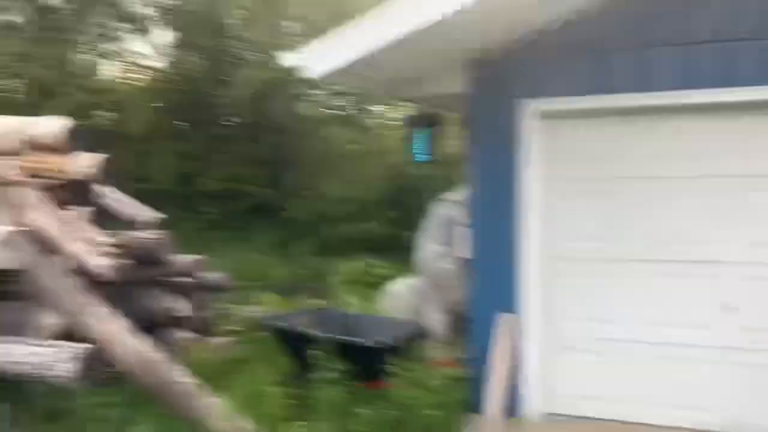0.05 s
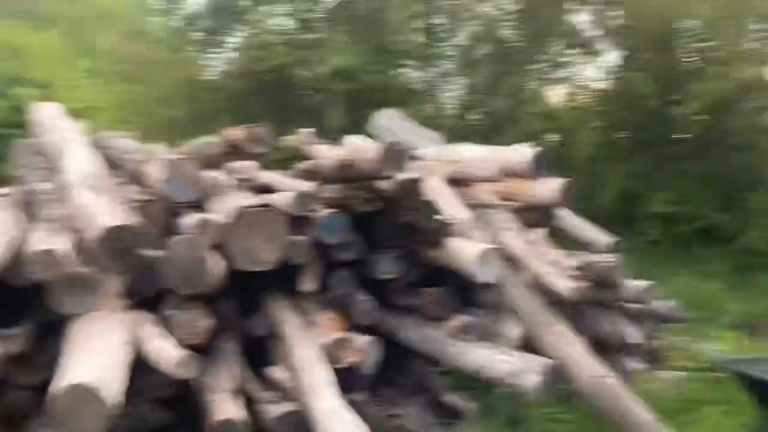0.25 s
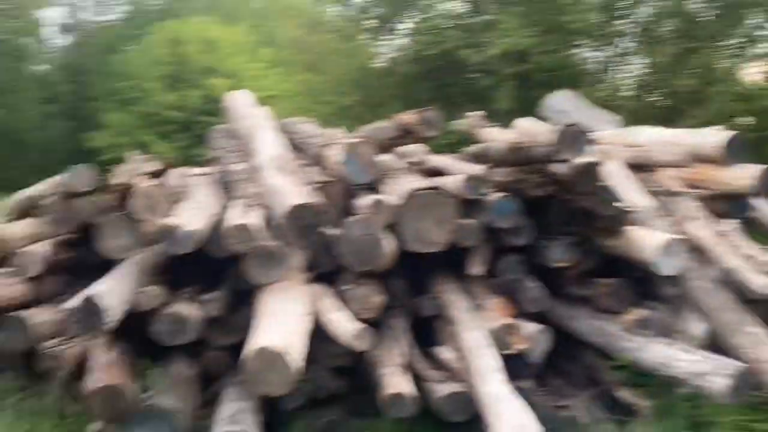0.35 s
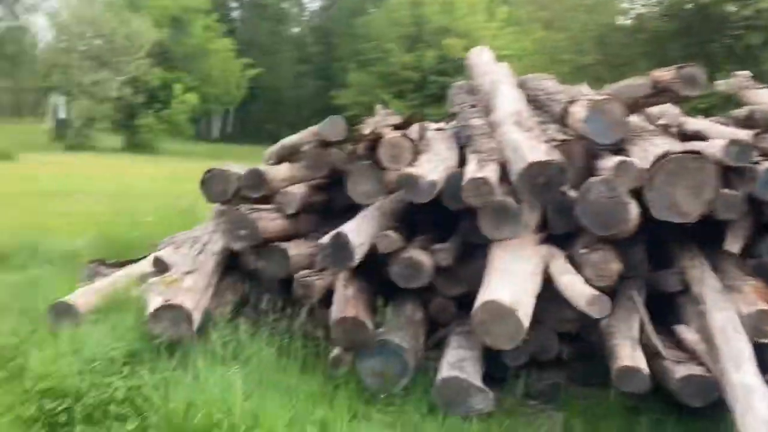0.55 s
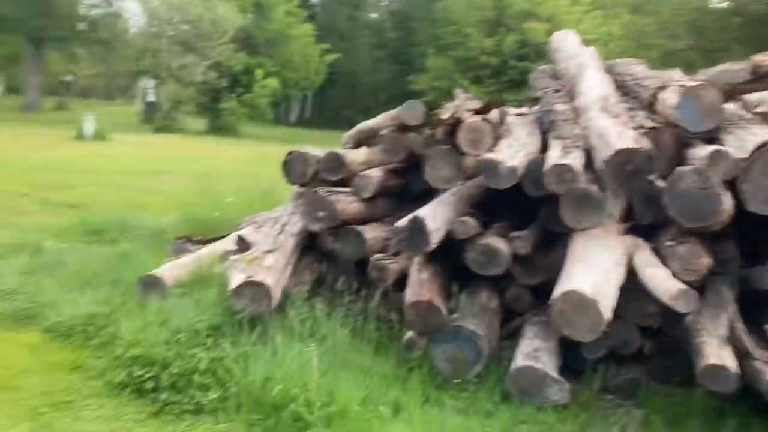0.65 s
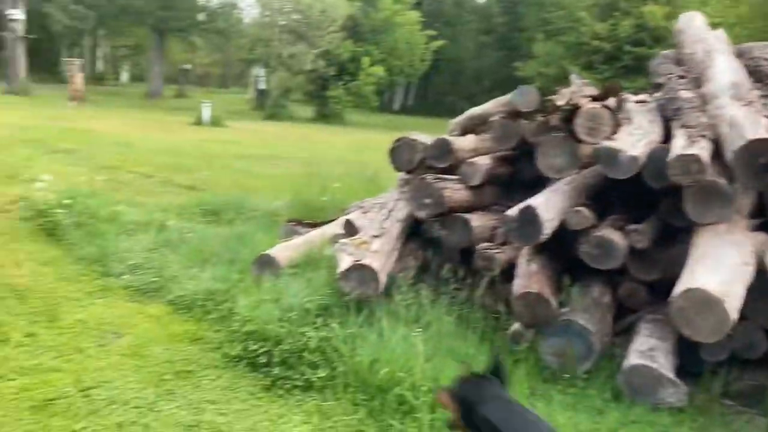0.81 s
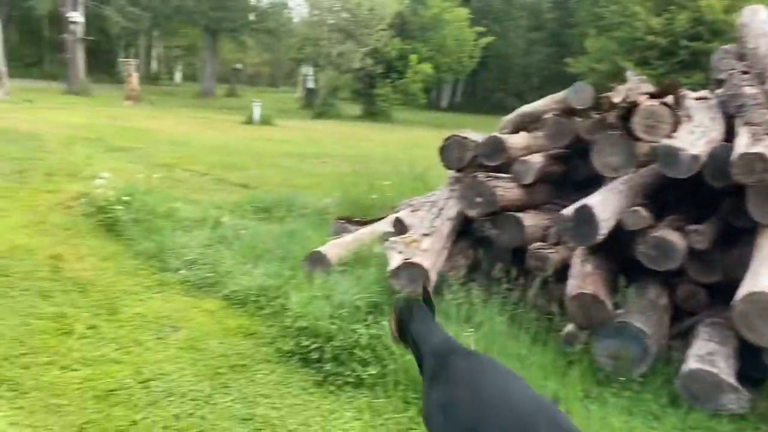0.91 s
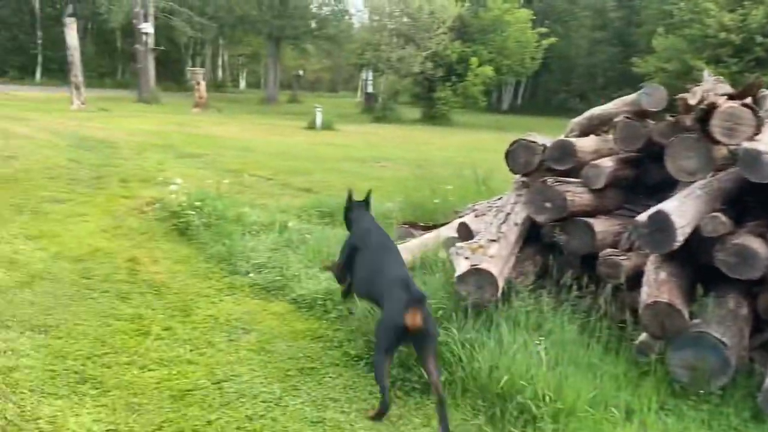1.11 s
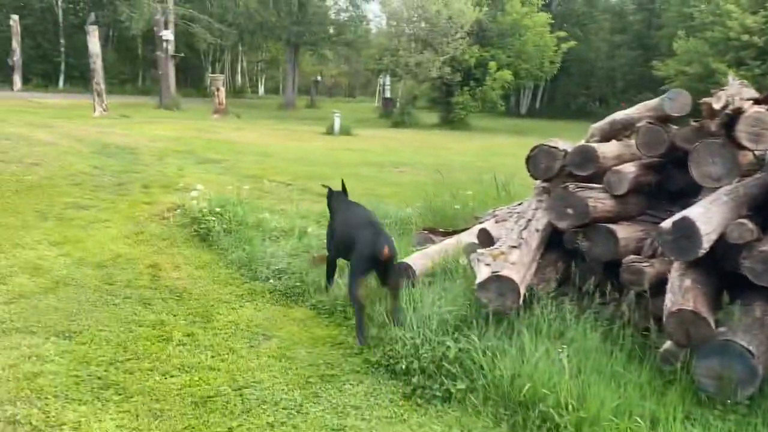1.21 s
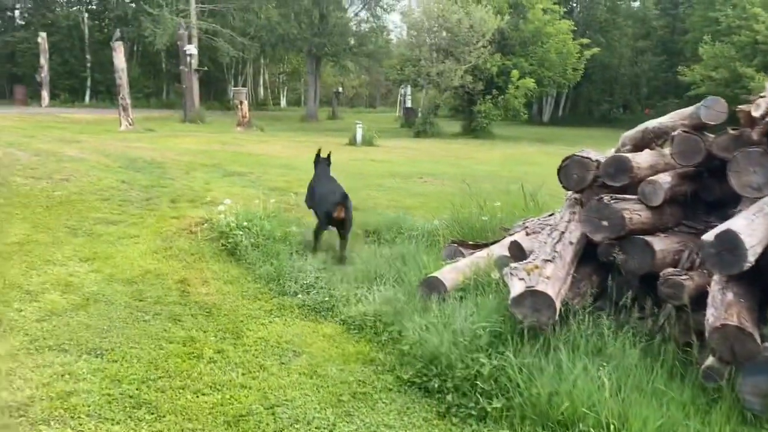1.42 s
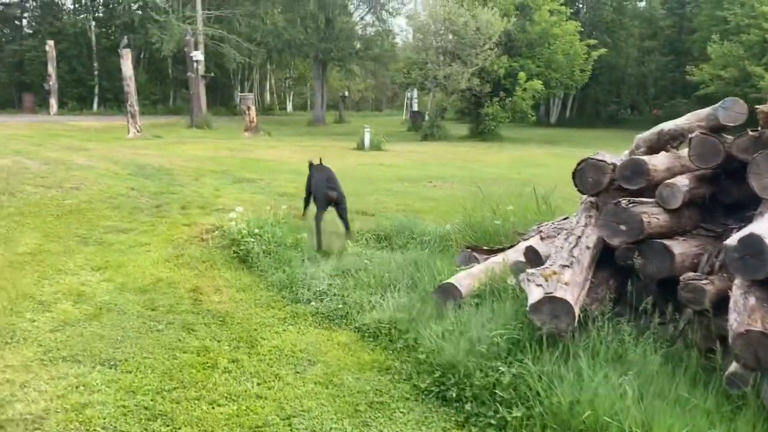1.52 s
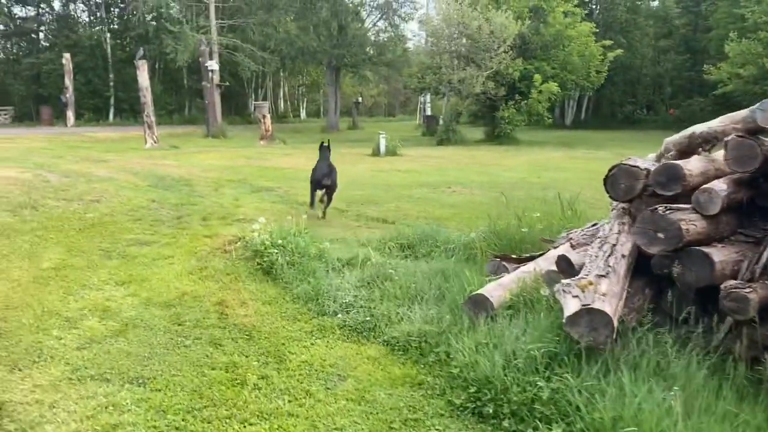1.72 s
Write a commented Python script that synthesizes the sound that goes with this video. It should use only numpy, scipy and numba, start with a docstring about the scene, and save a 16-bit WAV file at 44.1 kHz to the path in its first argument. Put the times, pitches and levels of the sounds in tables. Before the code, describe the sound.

A big dog barks close by outdoors. The faint, breathy end of an earlier call fades in the first 0.1 seconds, then one loud, rough bark sounds from 0.2 to 0.4 seconds, falling in pitch with a short echo. Soft footfalls and grass swishes follow until about 1.6 seconds, with tiny snaps and faint squeaks near 1.2 seconds. Low air rumble on the microphone runs underneath.

```python
"""A big dog's call falls away, and at once it barks again, close by on a lawn. The bark starts rough,
every second pulse weak, clears at its peak and drops in pitch: vocal-fold pulses and breath are the
source, throat and mouth the filter. Walls, logs and trees scatter it back. Then come soft footfalls
(damped impacts) and swishes of grass (friction), with tiny snaps and squeaks, over a low rumble of air
on a hand-held phone."""
import sys
import numpy as np
from scipy import signal
from scipy.fft import rfft, irfft
from scipy.io import wavfile
from scipy.ndimage import uniform_filter1d
from numba import njit

SR = 44100
rng = np.random.default_rng(int(sys.argv[2]) if len(sys.argv) > 2 else 0)


def store_wav(level_fs):
    """Save 16-bit WAV to argv[1]."""
    pcm = np.round(np.clip(np.atleast_2d(level_fs), -1, 1) * 32767)
    wavfile.write(sys.argv[1], SR, pcm.T.astype(np.int16))


N = 77175
TIME_S = np.arange(N) / SR

# vibration rate of the vocal folds: time_s, pitch_hz
BARK_PITCH = [(0.217, 335), (0.231, 350), (0.238, 378), (0.245, 404), (0.259, 421), (0.272, 419),
              (0.279, 404), (0.286, 366), (0.303, 351), (0.322, 314), (0.344, 245), (0.368, 212)]
# course of the bark; doubling (0-1) weakens every second pulse, rasp is relative to the voice:
# time_s, level_db, doubling, rasp_db, resonance_scale, opening_db
BARK_CONTOUR = [(0.219, -46, 0.4, -12, 1.2, -8.5), (0.225, -25, 0, -13.5, 1.0, -8.5),
                (0.23, -22, 0.2, -14, .99, -0.5), (0.237, -17.5, 1, -15, 0.99, 2.5),
                (0.256, -15.5, 0.74, -15.5, 1.02, 7), (0.276, -14.5, 1, -13, 1.04, 6),
                (0.285, -15, 0.25, -11, 1.01, 5.5), (0.291, -8.5, 0, -16, 0.93, 1),
                (0.303, -13.5, 0.4, -13.5, .97, 7.5), (0.311, -20, 0, -11, 0.94, 0.5),
                (0.324, -22, 0, -8.5, 0.98, -6), (0.345, -41, 0.45, 0.5, 0.98, 3),
                (0.37, -49.5, 0.3, 2.5, 0.93, 6.5)]
# fundamental radiated by chest and neck: time_s, level_db
BARK_CHEST = [(0.219, -63.5), (0.226, -34), (0.258, -33), (0.285, -41.5), (0.312, -37.5), (0.33, -43),
              (0.354, -45), (0.375, -60.5)]
# lower (throat) and upper (mouth) formants with the jaws wide: centre_hz, width_hz, gain_db
BARK_THROAT = [(627.5, 161, 13.5), (734.5, 126.6, 12.5), (1020, 170, 2.5)]
BARK_MOUTH = [(1497, 98, 5), (1657, 140, 2), (1862, 90, -5.5), (2033, 53, -11.5)]
# spectrum of air hissing past the teeth: frequency_hz, gain_db
BARK_TEETH = [(2000, -6), (2900, 1), (3550, -13), (4000, -10), (4750, -7), (5200, -5), (5800, -3),
              (6300, -7), (6850, -6), (7400, -10), (8200, -16), (8800, -25)]
# high resonances of the throat and between the closing jaws: centre_hz, width_hz, gain_db
UPPER_THROAT = [(4740, 260, 0), (6850, 330, -4)]
JAW_GAP = [(2900, 1200, 0)]
# their envelopes; the throat also rings faintly in the previous call: time_s, level_db
UPPER_THROAT_LEVELS = [(0.02, -80), (0.05, -68), (0.1, -88), (0.21, -110), (0.227, -72), (0.25, -54),
                       (0.265, -68), (0.286, -50.5), (0.3, -54), (0.318, -70)]
JAW_GAP_LEVELS = [(0.305, -68), (0.325, -55), (0.348, -59), (0.38, -76)]


def bark():
    """Formant resonance: a call shaped by the wide-open mouth, with breath ringing higher modes."""
    call = dog_voice(BARK_PITCH, BARK_CONTOUR, BARK_CHEST, BARK_THROAT, BARK_MOUTH, BARK_TEETH, -43.5)
    return call + breath_ring(UPPER_THROAT, UPPER_THROAT_LEVELS) + breath_ring(JAW_GAP, JAW_GAP_LEVELS)


# falling pitch of the previous call: time_s, pitch_hz
PREVIOUS_PITCH = [(0.0, 401.2), (0.016, 371.6), (0.03, 316.6), (0.055, 282.2), (0.08, 245.9),
                  (0.108, 240.5)]
# its course: time_s, level_db, doubling, rasp_db, resonance_scale, opening_db
PREVIOUS_CONTOUR = [(0.0, -42.5, 0.86, 2.5, 0.79, -7), (0.02, -37.5, 0.19, 1, 0.94, -11.5),
                    (0.034, -46, 0.18, 0.5, 0.93, -5.5), (0.057, -49.5, 0.17, 6.5, 0.82, 3.5),
                    (0.08, -47.5, .1, 4.5, 1, -3.5), (0.108, -55, .1, -3.5, 1, 6)]
# its fundamental from chest and neck: time_s, level_db
PREVIOUS_CHEST = [(0.0, -36), (0.013, -33), (0.023, -52), (0.062, -42), (0.095, -44), (0.112, -59.5)]
# formants with the jaws closing: centre_hz, width_hz, gain_db
PREVIOUS_THROAT = [(507, 140, -0.5), (650, 200, 2), (1033, 250, -2.5)]
PREVIOUS_MOUTH = [(1240, 190, 0), (1507.5, 57, 0.5), (1900, 490, -12.5)]
# spectrum of the hiss at the teeth: frequency_hz, gain_db
PREVIOUS_TEETH = [(2000, 1), (2700, -9), (3300, 5), (3900, -8), (4900, -10), (5700, -3.5), (6400, -9.5),
                  (8000, -12), (8800, -21)]


def previous_call():
    """A narrower opening lowers the first formant: the breathy end of a call through closing jaws."""
    return dog_voice(PREVIOUS_PITCH, PREVIOUS_CONTOUR, PREVIOUS_CHEST,
                     PREVIOUS_THROAT, PREVIOUS_MOUTH, PREVIOUS_TEETH, hiss_db=-35.5)


def dog_voice(pitch, contour, chest, throat, mouth, teeth, hiss_db):
    """Source and filter: vocal-fold pulses and turbulence drive the tract; period doubling roughens it."""
    jitter, shimmer_db, flutter_hz = .011, 1.9, 380
    hiss_growth = .55  # dB per dB of voice; hiss_db is the level for a full-scale call
    level_db, doubling, rasp_db, scale, opening_db = curves(contour)
    pitch_hz = curves(pitch)[0] * (1 + jitter * flutter(flutter_hz))
    phase = 2 * np.pi * np.cumsum(pitch_hz) / SR
    # odd multiples of half the pitch make alternate pulses unequal
    pulses = sum(np.cos(k * phase / 2) * (np.clip(doubling, 0, 1) if k % 2 else 1) for k in range(1, 30))
    pulses *= undb(shimmer_db * flutter(flutter_hz))
    voice = vocal_tract(pulses, throat, mouth, scale, opening_db)
    rasp = undb(rasp_db) * vocal_tract(puffs(phase, depth=.87), throat, mouth, scale, opening_db)
    hiss = undb(hiss_db + hiss_growth * level_db) * colour(puffs(phase, depth=.053), teeth)
    fundamental = undb(curves(chest)[0]) * np.sqrt(2) * np.sin(phase)
    subharmonic = undb(level_db - 28) * doubling * np.sin(phase / 2)
    from_mouth = undb(level_db) * (voice + rasp) + hiss
    return from_mouth * gate(contour) + (fundamental + subharmonic) * gate(chest)


def vocal_tract(source, throat, mouth, scale, opening_db):
    """Parallel formants and a nasal antiresonance, brighter as the mouth opens; held at unit level."""
    sound = resonate(source, throat, scale) + undb(opening_db) * resonate(source, mouth, scale)
    sound -= bandpass(sound, np.full(N, 1250.), width_hz=88.)  # notch of the nasal side branch
    sound = signal.sosfilt(signal.butter(8, 2200, fs=SR, output="sos"), sound)
    sound = signal.sosfilt(signal.butter(5, 510, "high", fs=SR, output="sos"), sound)
    power = uniform_filter1d(uniform_filter1d(sound ** 2, size=440), size=330)
    return sound / np.sqrt(power + 1e-12)


def puffs(phase, depth):
    """Amplitude modulation: turbulent airflow swells once in each cycle of the vocal folds."""
    return (1 + depth * np.cos(phase)) * white_noise()


def breath_ring(resonances, levels):
    """Forced resonance: puffs of air at the bark's pitch excite high modes of the airway."""
    phase = 2 * np.pi * np.cumsum(curves(BARK_PITCH)[0]) / SR
    ring = unit(resonate(puffs(phase, depth=1), resonances))
    return ring * undb(curves(levels)[0]) * gate(levels)


# treble-rich scatter from rough logs and walls, and the tail from the trees: frequency_hz, gain_db
WALL_SCATTER = [(2300, 0), (3200, 8), (4200, 5), (6000, 8), (9000, 6), (12000, 0)]
TREE_SCATTER = [(150, -7.5), (400, -0.5), (700, -12.5), (1100, 5.5), (1500, -9), (2000, 6), (3000, -1.5),
                (6000, -9)]


def yard_echoes(sound, delay_s=.018):
    """Reverberation: dense reflections decay exponentially, fast from walls, more slowly from trees."""
    def tail(spectrum, level_db, t60_s):
        decay = np.exp(-np.log(1000) * TIME_S / t60_s) * (TIME_S > delay_s)
        return undb(level_db) * unit(noise(spectrum) * decay) / np.sqrt(N)

    responses = [tail(WALL_SCATTER, -13.5, t60_s=.115) + tail(TREE_SCATTER, -29, t60_s=.36)
                 for _ in range(2)]
    return np.array([signal.fftconvolve(sound, response)[:N] for response in responses])


# impacts of feet on the lawn: start_s, level_db, pitch_hz, decay_s
FOOTFALLS = [(0.122, -39, 86, 0.0078), (0.415, -47, 282.2, 0.01), (0.456, -44, 426, 0.0092),
             (0.59, -48, 61.2, 0.048), (0.606, -42.5, 397, 0.0026), (0.725, -44, 340, 0.0025),
             (0.787, -52, 170, 0.0061), (0.899, -37.5, 243.3, 0.0027), (1.015, -45, 258.6, 0.0065),
             (1.057, -43, 230, 0.0027), (1.223, -44, 540, 0.004), (1.226, -63, 73.4, 0.016),
             (1.232, -46.5, 238, 0.0093), (1.375, -44, 230, 0.0022), (1.418, -54.5, 313, 0.0053),
             (1.592, -53.5, 258.8, 0.0036)]


def footfalls(attack_s=.002):
    """Damped oscillation: each impact is a dull, quickly dying thud with a little crunch of grass."""
    steps, crunch = np.zeros(N), .135 * noise(BRUSH_SPECTRUM)
    for start_s, level_db, pitch_hz, decay_s in FOOTFALLS:
        age_s = np.maximum(TIME_S - start_s, 0)
        envelope = np.minimum(age_s / attack_s, 1) * np.exp(-np.maximum(age_s - attack_s, 0) / decay_s)
        steps += undb(level_db) * envelope * (crunch - np.sin(2 * np.pi * pitch_hz * age_s))
    return at_ports(steps)


# swishes of grass and cloth: peak_s, half_length_s, brush_db, crackle_db
SWISHES = [(0.124, 0.0072, -78.5, -70.5), (0.161, 0.071, -53, -79.5), (0.425, 0.0074, -60, -71.5),
           (0.484, 0.017, -65.5, -74.5), (0.539, 0.014, -50, -72.5), (0.594, 0.017, -69, -77),
           (0.639, 0.073, -74.5, -77.5), (0.718, 0.0067, -61, -73.5), (0.805, 0.0073, -66, -76.5),
           (0.842, 0.015, -67.5, -79.5), (0.898, 0.0061, -60, -74), (1.007, 0.0059, -90, -78),
           (1.07, 0.024, -69.5, -79.5), (1.159, 0.039, -77.5, -85.5), (1.209, 0.011, -65, -75.5),
           (1.235, 0.011, -61.5, -73.5), (1.273, 0.021, -69, -82), (1.388, 0.051, -74.5, -80),
           (1.544, 0.028, -73.5, -90)]
# spectra of their two parts: frequency_hz, gain_db
BRUSH_SPECTRUM = [(120, -21.5), (300, 3), (600, 7.5), (1100, 2), (1500, -5.5), (2100, -10.5), (2900, -28.5),
                  (5000, -36), (9000, -90.5)]
CRACKLE_SPECTRUM = [(800, -52.5), (2000, -18), (3300, 6.5), (4100, -3), (5200, 3), (6500, 4), (8200, 4.5),
                    (9200, -9.5)]


def grass_swishes(grain_s=.0004, grain_db=2.1):
    """Friction noise: a soft brushing swells and fades with the fine crackle of single blades."""
    brush_gain, crackle_gain = np.zeros(N), np.zeros(N)
    for peak_s, half_length_s, brush_db, crackle_db in SWISHES:
        swell = np.exp(-.5 * ((TIME_S - peak_s) / half_length_s) ** 2)
        brush_gain += undb(brush_db) * swell
        crackle_gain += undb(crackle_db) * swell
    blade = (TIME_S / grain_s).astype(int)

    def crackle():
        grains = white_noise() * undb(grain_db * rng.exponential(size=N)[blade])
        return colour(grains, CRACKLE_SPECTRUM)

    return brush_gain * spread(lambda: noise(BRUSH_SPECTRUM)) + crackle_gain * spread(crackle)


# dry stalks breaking: start_s, level_db, centre_hz
STALK_SNAPS = [(0.197, -59, 6500), (0.417, -59, 7000), (0.584, -64, 5500), (0.605, -57, 3100),
               (0.630, -60, 7800), (0.7145, -58, 1500), (0.737, -66, 7500), (0.896, -64, 6500)]


def stalk_snaps(decay_s=.0012):
    """Brittle fracture: a stalk gives way with a tiny broadband tick, lower for a thicker stalk."""
    ticks = np.zeros(N)
    for start_s, level_db, centre_hz in STALK_SNAPS:
        envelope = (TIME_S >= start_s) * np.exp(-np.abs(TIME_S - start_s) / decay_s)
        band = resonate(white_noise(), [(centre_hz, .6 * centre_hz, 0)])
        ticks += undb(level_db) * envelope * unit(band)
    return at_ports(ticks)


# wet grass under a sole: peak_s, half_length_s, level_db, pitch_hz, glide_hz_per_s
SQUEAKS = [(1.197, 0.0095, -62.5, 690, -8000), (1.224, 0.0048, -54.5, 1056, 7003),
           (1.242, 0.0063, -72, 1250, -7000), (1.267, 0.017, -67.5, 1220, -1000)]


def grass_squeaks(width_hz=102):
    """Friction-driven resonance: blades rubbed by a sole ring briefly in a narrow, gliding band."""
    squeaks = np.zeros(N)
    for peak_s, half_length_s, level_db, pitch_hz, glide_hz_per_s in SQUEAKS:
        offset_s = np.clip(TIME_S - peak_s, -6 * half_length_s, 6 * half_length_s)
        glide = np.exp(glide_hz_per_s * offset_s / pitch_hz)
        rub = resonate(white_noise(), [(pitch_hz, width_hz, 0)], glide)
        squeaks += undb(level_db) * np.exp(-.5 * (offset_s / half_length_s) ** 2) * unit(rub)
    return at_ports(squeaks)


# spectra of air on the microphone and of the distant outdoors: frequency_hz, gain_db
RUMBLE_SPECTRUM = [(20, -25), (35, -12), (58, 1), (85, -4.5), (120, -10.5), (200, -17), (400, -66)]
HUSH_SPECTRUM = [(80, -13), (200, -2), (400, -2), (700, -4.5), (1100, -17.5), (1700, -26), (2800, -36),
                 (4200, -39), (6000, -38.5), (8300, -37.5), (9500, -53)]
# their envelopes: time_s, rumble_db, hush_db
AIR_LEVELS = [(0, -59, -62), (0.4, -55, -54), (0.52, -66, -75.5), (0.62, -57.5, -67), (0.7, -58.5, -66.5),
              (0.8, -57, -64.5), (0.92, -59.5, -63), (1.01, -53.5, -67), (1.14, -59, -74),
              (1.3, -59.5, -70.5), (1.47, -62, -70.5), (1.52, -57.5, -69.5), (1.61, -56.5, -73.5),
              (1.75, -66.5, -71)]


def background_air():
    """Turbulent pressure: air rumbles on the moving phone, over a faint outdoor hush."""
    rumble_db, hush_db = curves(AIR_LEVELS)
    rumble = noise(RUMBLE_SPECTRUM) + .5 * np.array([noise(RUMBLE_SPECTRUM) for _ in range(2)])
    return undb(rumble_db) * rumble + undb(hush_db) * spread(lambda: noise(HUSH_SPECTRUM))


# lag of the left microphone port behind the right: frequency_hz, lag_ms
PORT_LAG = [(250, 0.29), (700, 0.28), (1120, 0.17), (1640, 0.35), (3000, 0.425)]


def at_ports(sound):
    """Time difference of arrival: a sound reaches the left port a little after the right."""
    hz = np.fft.rfftfreq(2 * N, 1 / SR)
    lag_s = np.interp(hz, *np.array(PORT_LAG, float).T) / 1000
    left = irfft(rfft(sound, 2 * N) * np.exp(-2j * np.pi * hz * lag_s))[:N]
    return np.array([left, sound])


def spread(make_noise, diffuse_db=-4):
    """Partial coherence: direct noise reaches both ports, and a diffuse part differs between them."""
    return at_ports(make_noise()) + undb(diffuse_db) * np.array([make_noise(), make_noise()])


def resonate(source, resonances, scale=1.):
    """Parallel resonances, each two band-passes in cascade; scale multiplies the centre frequencies."""
    sound = np.zeros(N)
    for centre_hz, width_hz, gain_db in resonances:
        track_hz = centre_hz * scale * np.ones(N)
        once = bandpass(source, track_hz, float(width_hz))
        sound += undb(gain_db) * bandpass(once, track_hz, float(width_hz))
    return sound


@njit
def bandpass(x, centre_hz, width_hz):
    """Second-order resonator: a state-variable filter with a moving centre."""
    y, band_state, low_state = np.empty(len(x)), 0., 0.
    for i in range(len(x)):
        tuning, damping = np.tan(np.pi * centre_hz[i] / SR), width_hz / centre_hz[i]
        band = (band_state + tuning * (x[i] + 1e-18 - low_state)) / (1 + tuning * (tuning + damping))
        band_state, low_state = 2 * band - band_state, low_state + 2 * tuning * band
        y[i] = damping * band
    return y


def undb(db):
    """Decibels as an amplitude ratio."""
    return 10 ** (np.asarray(db) / 20)


def unit(x):
    """Normalisation to unit RMS."""
    return x / np.sqrt(np.mean(x ** 2) + 1e-20)


def curves(table):
    """Linear interpolation of a table's columns over time."""
    times_s, *columns = np.array(table, float).T
    return [np.interp(TIME_S, times_s, column) for column in columns]


def gate(table, fade_s=.003):
    """Time window: one between a table's first and last time, with Gaussian fades outside."""
    outside_s = np.maximum(np.maximum(table[0][0] - TIME_S, TIME_S - table[-1][0]), 0)
    return np.exp(-(outside_s / fade_s) ** 2)


def frequency_response(spectrum, size):
    """Gain at each bin, interpolated in decibels over log frequency."""
    hz, db = np.array(spectrum, float).T
    return undb(np.interp(np.log(np.fft.rfftfreq(size, 1 / SR) + 1), np.log(hz), db))


def colour(x, spectrum):
    """Spectral shaping, at unit RMS."""
    return unit(irfft(rfft(x) * frequency_response(spectrum, N), N))


def white_noise():
    """Independent Gaussian samples have a flat spectrum."""
    return rng.standard_normal(N)


def noise(spectrum):
    """Filtered white noise, at unit RMS."""
    return colour(white_noise(), spectrum)


def flutter(rate_hz):
    """Random modulation with a spread near one."""
    return np.interp(TIME_S * rate_hz, np.arange(N), white_noise())


def scene():
    """Superposition: the dog and its echoes, steps through the grass, and the air."""
    dog = bark() + previous_call()
    return (at_ports(dog) + yard_echoes(dog)
            + footfalls() + grass_swishes() + stalk_snaps() + grass_squeaks() + background_air())


# level difference between the microphone ports: frequency_hz, left_minus_right_db
PORT_BALANCE = [(60, 5), (180, -6.5), (310, 0.5), (600, 1.5), (800, -2.5), (1100, 5.5), (1500, 9.5),
                (2870, 11.5), (4990, 9.5), (7000, 2), (8500, -15)]


def record(dry):
    """Microphone response: each port has its own colour; the top and the deepest rumble are cut."""
    left_gain = np.sqrt(frequency_response(PORT_BALANCE, 2 * N))
    heard = irfft(rfft(dry, 2 * N) * np.array([left_gain, 1 / left_gain]))[:, :N]
    heard = signal.sosfilt(signal.butter(3, 30, "high", fs=SR, output="sos"), heard)
    return signal.sosfilt(signal.ellip(8, .2, 70, 8800, fs=SR, output="sos"), heard)


dry = scene()
out = record(dry)
store_wav(out)
```